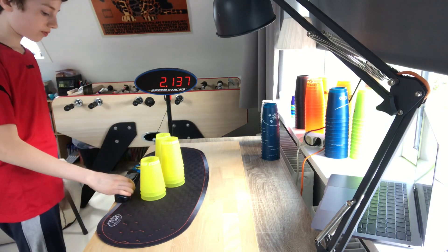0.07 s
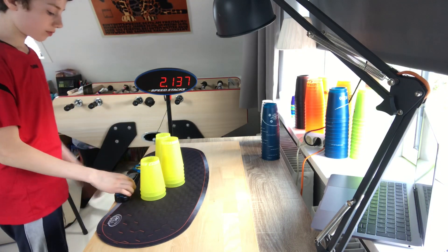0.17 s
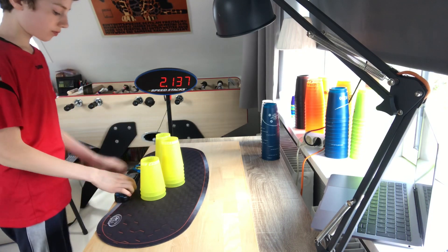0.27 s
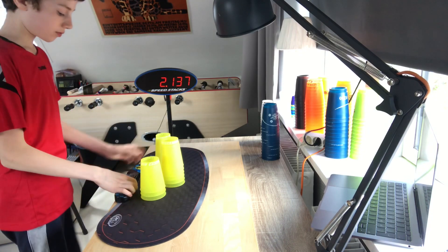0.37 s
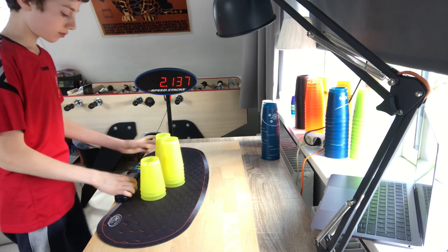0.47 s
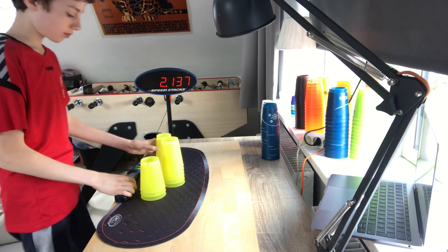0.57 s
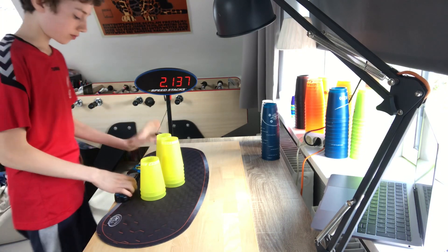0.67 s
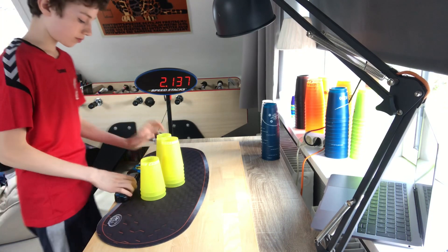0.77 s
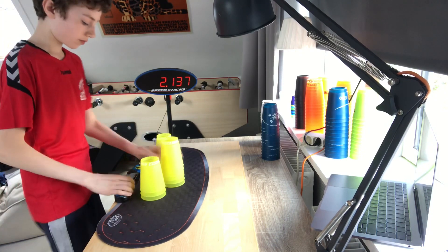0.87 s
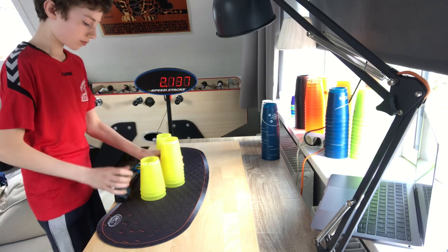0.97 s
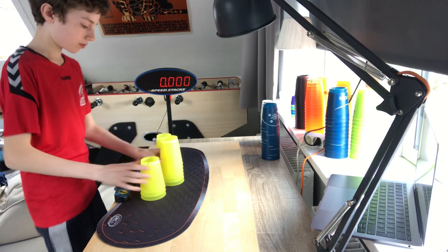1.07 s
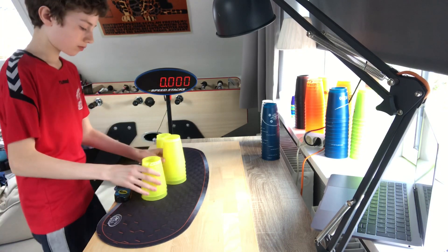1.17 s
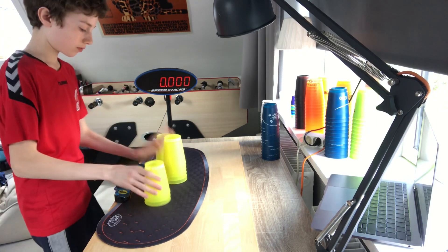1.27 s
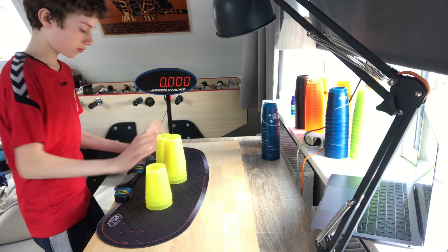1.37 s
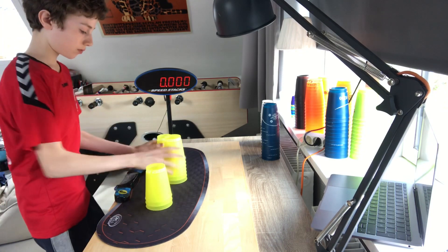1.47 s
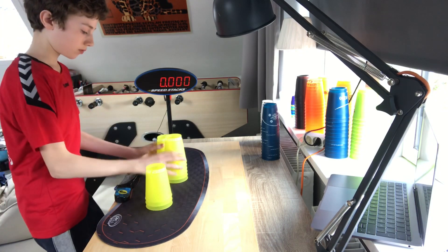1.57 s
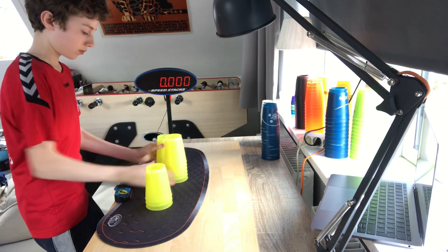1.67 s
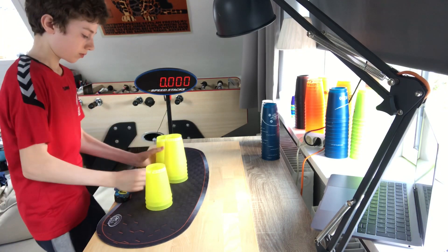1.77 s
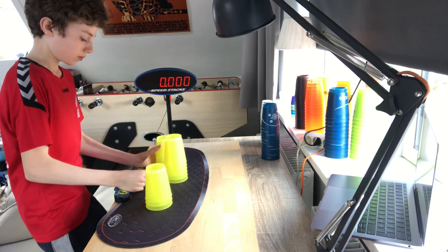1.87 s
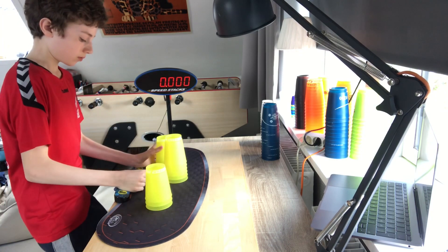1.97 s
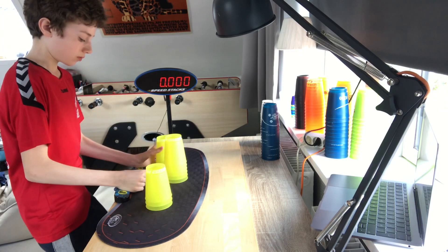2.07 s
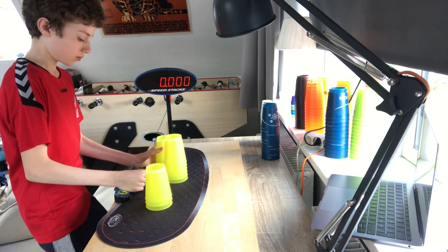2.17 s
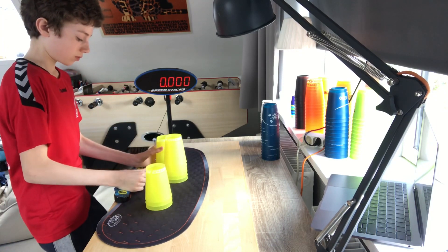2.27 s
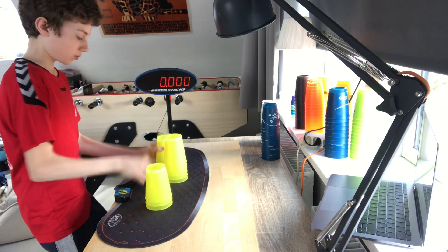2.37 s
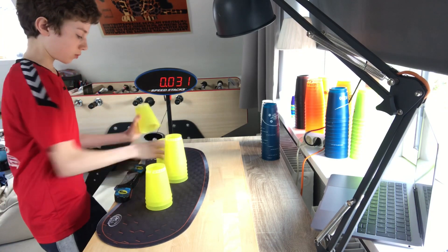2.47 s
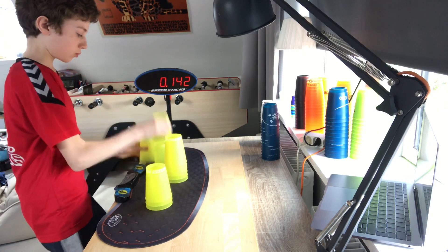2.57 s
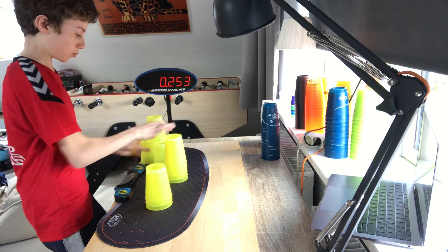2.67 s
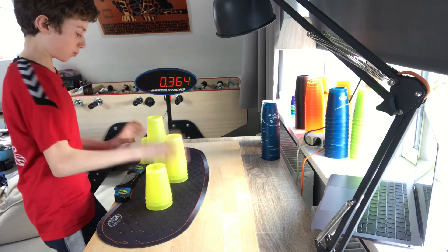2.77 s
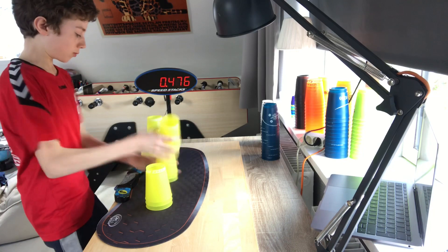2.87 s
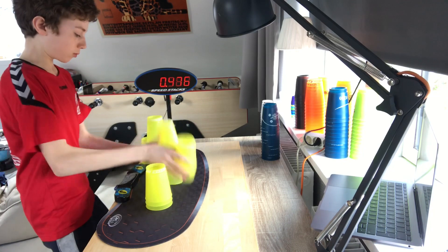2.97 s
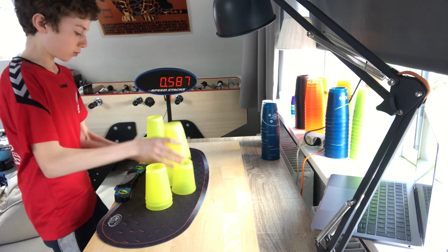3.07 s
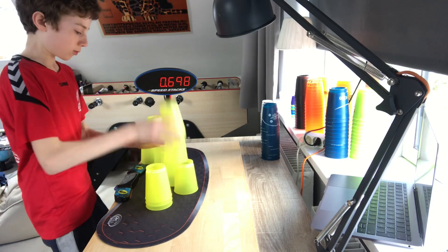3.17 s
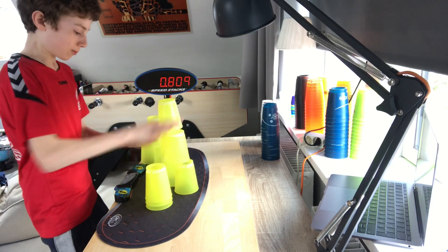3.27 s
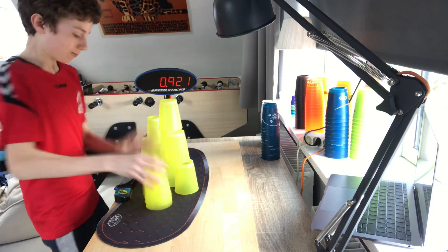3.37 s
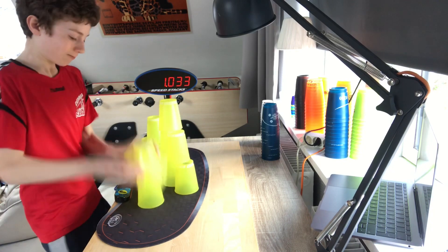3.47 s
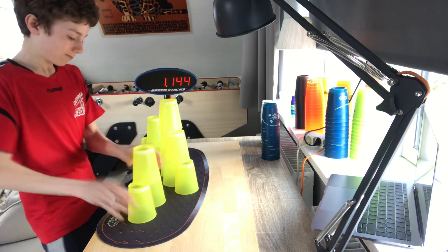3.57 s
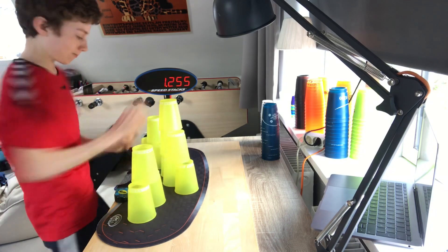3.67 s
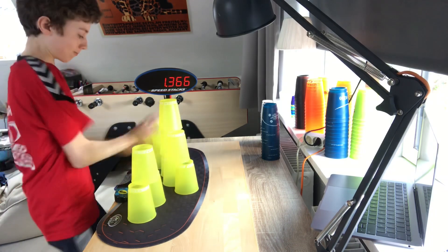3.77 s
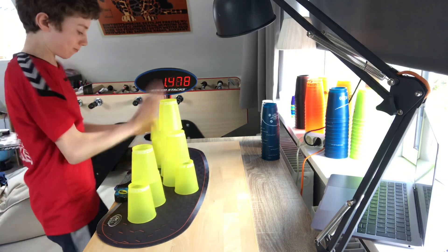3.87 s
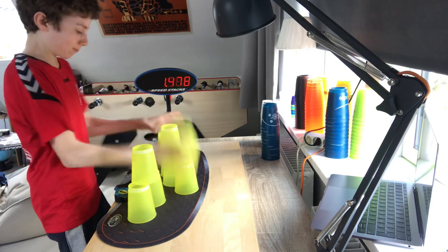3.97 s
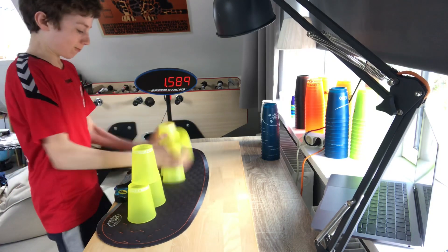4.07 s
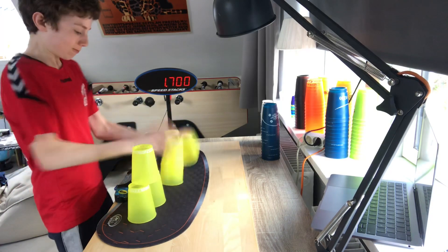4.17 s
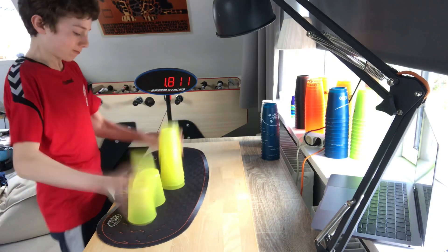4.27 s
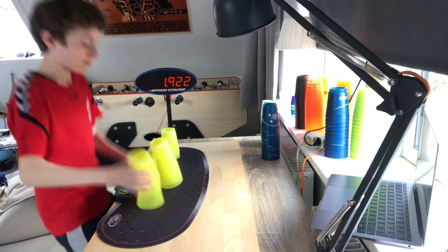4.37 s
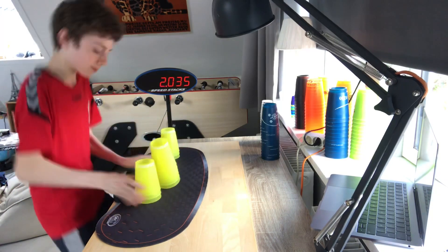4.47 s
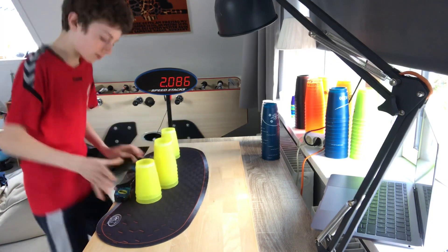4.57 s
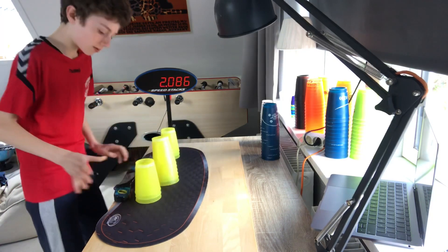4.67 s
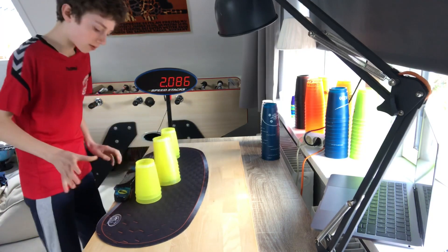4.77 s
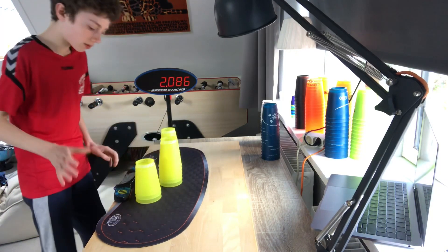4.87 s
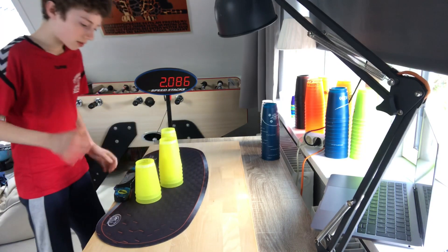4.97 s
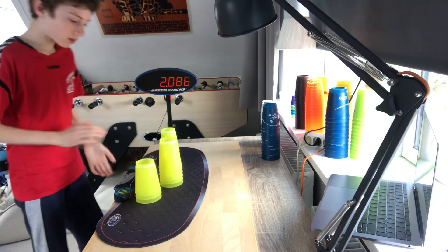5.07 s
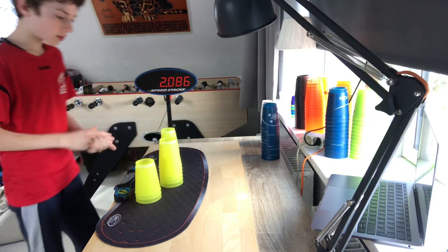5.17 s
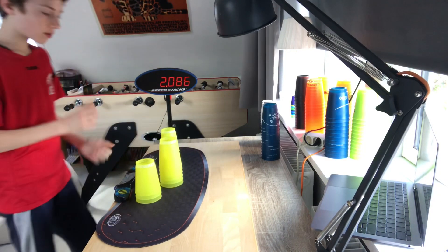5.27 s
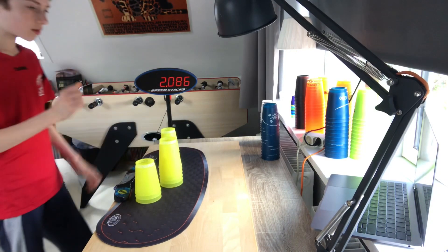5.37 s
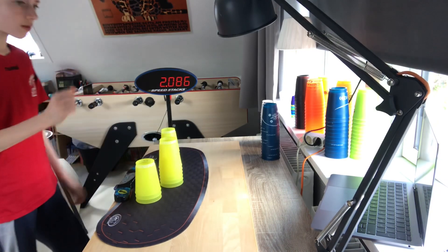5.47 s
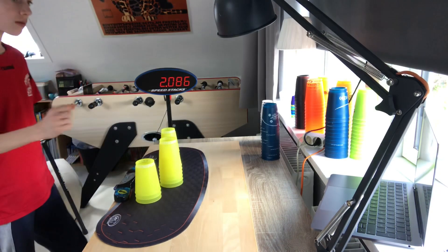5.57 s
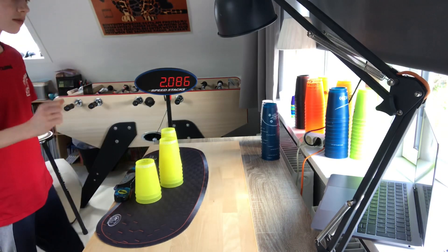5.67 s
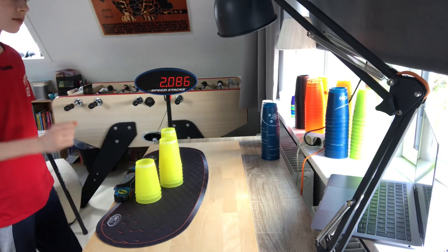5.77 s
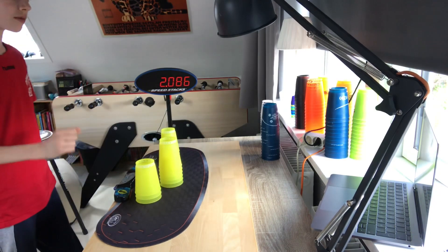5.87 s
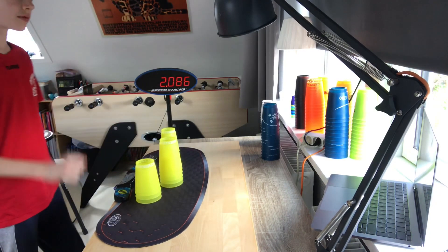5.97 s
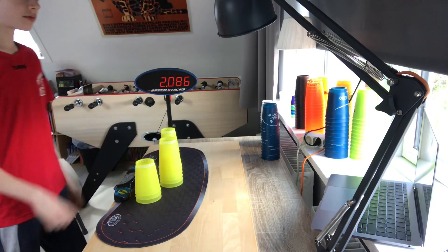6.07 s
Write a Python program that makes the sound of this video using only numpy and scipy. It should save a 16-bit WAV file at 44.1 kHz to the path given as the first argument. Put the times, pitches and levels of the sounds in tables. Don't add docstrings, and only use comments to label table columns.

```python
import sys
import numpy as np
from scipy import signal
from scipy.fft import rfft, irfft, next_fast_len
from scipy.io import wavfile
from scipy.ndimage import uniform_filter1d, map_coordinates

SR = 44100
rng = np.random.default_rng(int(sys.argv[2]) if len(sys.argv) > 2 else 0)


def waveform_to_disk(signal):
    frames = np.transpose(np.atleast_2d(signal))
    scaled = np.clip(frames, -1, 1) * 32767
    samples = np.round(scaled).astype(np.int16)
    wavfile.write(sys.argv[1], SR, samples)


def volts_from_db(level):
    exponent = np.asarray(level, float) / 20
    return 10 ** exponent


N = 269098

# (frequency [Hz], density [dB/Hz])
WHITE = [(20, 0), (20000, 0)]
# (frequency [Hz], density [dB/Hz])
AIR_SPECTRUM = [(22, -6.5), (59, -7.5), (285, -2.5), (500, -11), (1230, -16.5), (6560, -26.5), (14000, -33),
                (16000, -40)]
# (frequency [Hz], density [dB/Hz])
FLOOR_SPECTRUM = [(20, -25.5), (45, 9.5), (80, 1.5), (140, -10), (250, -46)]
# (time [s], fade [s], level [dB])
SWAYS = [(0, .4, -79), (1.04, .15, -53), (1.25, 0.22, -57.5), (1.82, .15, -50), (2.3, .25, -56),
         (2.9, .3, -51.5), (4.0, .25, -50.5), (4.47, .15, -45.5), (4.88, .3, -48), (5.3, .35, -51.5),
         (5.6, .12, -56)]
# (time [s], fade [s], level [dB], hiss over scrape [dB])
STROKES = [(.5, 0.056, -71, -1), (0.869, 0.17, -63.5, 1.5), (0.988, 0.053, -63, -1), (1.16, 0.16, -65, 1.5),
           (1.41, 0.02, -65, 0), (1.47, 0.12, -61.5, -3), (1.629, 0.15, -64, 1), (1.72, 0.1, -67, -4.5),
           (2.37, .04, -69, 22), (2.5, 0.034, -68.5, 10.5), (2.72, .12, -59, -14), (2.88, 0.15, -48, -2.5),
           (3.17, 0.14, -45.5, -5.5), (3.4, 0.14, -46.5, -3), (3.8, 0.099, -33.5, -0.5),
           (3.95, 0.13, -24.5, 1), (4.1, 0.091, -36, -3), (4.3, 0.13, -34.5, -10), (4.6, 0.17, -57.5, 4),
           (4.83, 0.069, -64, -8), (5.05, 0.19, -68, -2), (5.46, 0.11, -74, 0), (6.1, 0.142, -70, 6)]
# (frequency [Hz], density [dB/Hz])
HISS_SPECTRUM = [(1200, -23.5), (2200, 2.5), (3200, 5), (4200, 0.5), (5000, -0.5), (6500, -1),
                 (9000, -10.5), (15500, -21)]
# (frequency [Hz], density [dB/Hz])
SCRAPE_SPECTRUM = [(150, -32.5), (400, -2), (1000, -1.5), (1800, -0.5), (3000, -29)]

# (time [s], level [dB], hollow pitch [Hz], ring [ms], rim [dB])
SETUP = [(.4982, -56, 543, 33, -67), (.9019, -51.5, 422, 26, -71.5), (1.3918, -47, 448, 29, -53.5),
         (1.4557, -35, 487, 9, -49.5), (1.5053, -43, 448, 26, -75.5), (1.6563, -47.5, 560, 20, -65.5),
         (2.267, -55, 1310, 15, -62), (2.3223, -55, 1270, 12, -60), (2.3545, -58, 1000, 9.5, -54),
         (2.357, -46, 468, 38, -49.5), (2.363, -57.5, 3100, 55, -48.5), (2.4593, -48.5, 570, 27, -55),
         (2.4711, -45, 600, 22, -57.5), (2.5349, -41.5, 830, 28, -35.5), (2.5426, -42, 830, 33, -41.5),
         (2.5585, -41.5, 564, 50, -67), (2.601, -31, 600, 8.5, -54)]
# (time [s], level [dB], hollow pitch [Hz], ring [ms], rim [dB])
PAD_SLAPS = [
    (1.2099, -35, 1100, 15, -43.5),
    (1.2101, -39.5, 1640, 16, -54),
    (1.2102, -44, 2880, 19, -63),
    (1.2108, -37.5, 570, 27, -61),
    (1.6891, -10.5, 1080, 10, -26.5),
    (1.6894, -18, 3100, 3.9, -41.5),
    (1.6905, -17.5, 565, 37, -30),
]
# (time [s], level [dB], hollow pitch [Hz], ring [ms], rim [dB])
BASE = [(2.6056, -11, 1043, 30, -20), (2.6075, -12, 600, 53, -28), (2.6098, -33, 930, 20, -20.5),
        (2.757, -39, 860, 20, -42), (2.7642, -34, 900, 12, -29), (2.767, -32.5, 528, 30, -52),
        (2.8172, -35, 544, 15, -29), (2.8375, -29.5, 1690, 11, -37), (2.8448, -20, 970, 7, -27.5),
        (2.851, -47, 1480, 20, -34.5), (2.8932, -20, 990, 7.6, -23.5), (2.904, -37, 1200, 15, -38.5),
        (2.9722, -9, 930, 9.6, -43), (2.974, -19.5, 640, 37, -33), (2.9776, -19, 1110, 14, -21),
        (3.046, -15, 470, 26, -27.5), (3.1016, -31, 745, 20, -34), (3.1359, -14.5, 1027, 23, -26.5),
        (3.151, -20, 960, 14, -32), (3.158, -30.5, 800, 12, -42), (3.1647, -25, 1030, 9, -45),
        (3.173, -26.5, 1200, 9, -37.5), (3.1812, -20, 1039, 11, -29.5), (3.1916, -19, 970, 18, -32),
        (3.199, -14.5, 624, 20, -35), (3.2082, -8.5, 1315, 28, -17), (3.2172, -14, 1340, 20, -22.5),
        (3.229, -28, 1420, 22, -40.5), (3.2865, -24.5, 1350, 30, -43)]
# (time [s], level [dB], hollow pitch [Hz], ring [ms], rim [dB])
SMALL = [(3.329, -36.5, 632.4, 15, -34), (3.3525, -36, 600, 26, -31), (3.3705, -36, 2400, 11, -32.5),
         (3.3752, -23.5, 840, 20.5, -18.5), (3.3842, -23, 1080, 4, -34), (3.4445, -29, 944, 8.9, -22.5),
         (3.4478, -24.5, 910, 12, -20.5), (3.472, -28.5, 1170, 17, -45.5), (3.4763, -4.5, 1020, 17.5, -26),
         (3.4815, -1.5, 920, 11, -31.5), (3.487, -18, 1100, 9.5, -23.5), (3.506, -9.5, 1170, 15, -13.5),
         (3.511, -16, 696, 17, -14), (3.5172, -11.5, 840, 17, -23), (3.534, -20, 854, 28, -46),
         (3.7172, -30, 900, 8, -33.5), (3.7195, -11, 571, 40, -40.5)]
# (time [s], level [dB], hollow pitch [Hz], ring [ms], rim [dB])
SWEEP = [(3.7405, -26.5, 580, 42, -29), (3.7458, -37, 894, 15, -30), (3.759, -31, 931, 28, -21),
         (3.7687, -23.5, 1220, 27, -21), (3.7914, -15.5, 987, 17, -26), (3.8316, -24, 951, 9.7, -23.5),
         (3.8385, -20, 910, 20, -19.5), (3.859, -24, 597, 29, -35.5), (3.8748, -24.5, 1011, 27, -22.5),
         (3.883, -33, 3186, 33, -25.5), (3.901, -20.5, 1335, 42, -35), (3.9087, -17, 1030, 14, -32.5),
         (3.9184, -21, 1038, 9, -24), (3.9218, -11, 640, 22, -7.5), (3.9418, -19.5, 1120, 27, -5),
         (3.949, -21, 1930, 16, -9), (3.9565, -5, 735, 19, -18.5), (3.9675, -9.5, 980, 16, -8.5),
         (3.971, -11, 899, 12, -13.5), (3.9785, -26, 990, 8.9, -9.5), (4.0431, -29.5, 1040, 20, -46.5),
         (4.0736, -26, 1110, 25, -29.5)]
# (time [s], level [dB], hollow pitch [Hz], ring [ms], rim [dB])
FINISH = [(4.091, -16, 1960, 10, -12.5), (4.101, -31.5, 1000, 15, -21.5), (4.1357, -40.5, 856, 8, -49),
          (4.1541, -25, 803.6, 30, -19.5), (4.177, -35.5, 910, 10, -33.5), (4.1878, -18, 1430, 7.1, -30.5),
          (4.212, -18, 864, 30, -30), (4.217, -19, 940, 20, -21.5), (4.226, -29.5, 895, 17, -23),
          (4.2322, -17, 1410, 25, -8.5), (4.2403, -6, 1476, 20, -7.5), (4.2611, -11.5, 700, 20, -22),
          (4.272, -18.5, 1294, 25, -20), (4.3142, -12, 860, 19, -13), (4.3338, -12, 630, 30, -16.5),
          (4.342, -14, 500, 25, -25.5), (4.3572, -8, 818, 60, -9.5), (4.364, -20, 902, 12, -19.5),
          (4.3697, -3, 843, 12, -22), (4.3895, -10, 3800, 7, -15), (4.3925, -7, 2800, 9, -22),
          (4.396, -8, 1840, 9, -25), (4.401, -17.5, 1100, 12, -23.5), (4.4205, -17, 630, 9.7, -32.5)]
# (time [s], level [dB], hollow pitch [Hz], ring [ms], rim [dB])
AFTER = [
    (4.7884, -40.5, 520, 7.3, -64),
    (4.7882, -37.5, 2040, 8.4, -58),
    (4.8215, -33, 1446, 7.8, -39),
    (4.8218, -36.5, 3180, 5.6, -53),
    (4.8225, -37.5, 673, 68, -59),
    (4.8855, -41, 1490, 7.5, -61),
    (4.89, -43, 520, 27, -67),
]
# (contacts, brightness [dB])
STAGES = [
    (PAD_SLAPS, -18.5),
    (SETUP, 0.11),
    (BASE, -0.14),
    (SMALL, -0.91),
    (SWEEP, 1.3),
    (FINISH, 0.1),
    (AFTER, -6),
]

# (frequency [Hz], level [dB], t60 [s])
WALL_MODES = [(580, -13.5, 0.056), (830, -21, 0.0061), (1080, -4.5, .025), (1290, -14, 0.047),
              (1935, -15.5, 0.03)]
# (frequency [Hz], width [Hz], level [dB])
STACK_BODY = [(328, 100, -10), (600, 360, 3.5), (1120, 420, 3), (1510, 530, 0), (2040, 2500, -16.5)]
# (frequency [Hz], width [Hz], level [dB])
RIM = [(3324, 410, -5.5), (4120, 410, 0.5), (5850, 1100, -1.5)]
# (frequency [Hz], width [Hz], level [dB])
FINE_RIM = [(6800, 1500, 7), (8800, 3000, -4.5), (11160, 900, -7.5), (14890, 2300, -10)]
# (frequency [Hz], width [Hz], level [dB])
FLAT_SLAP = [(1880, 2200, 3.5)]
# (frequency [Hz], level [dB], t60 [s])
LIP_MODES = [(2560, -10, .015), (3260, -2, 0.032), (3930, -6.5, .022), (4240, -2.5, 0.02),
             (5780, -2.5, 0.017)]
# (frequency [Hz], width [Hz], depth [0-1])
RIM_NOTCH = (5050, 500, 0.44)
# (delay [ms], level [dB])
WALL_ECHOES = [(4.2, -21.5), (9.5, -14.5), (12.1, -22.5)]
# (frequency [Hz], t60 [s])
ROOM_DECAY = [(100, 0.94), (420, .33), (1100, 0.28), (2500, 0.32), (3700, .26), (7700, 0.22), (15000, 0.08)]

# (time [s], peak [dB], frequency [Hz])
THUMPS = [(0.978, -38.5, 69.4), (1.513, -47.5, 65), (1.726, -32, 61.7), (2.756, -44.5, 136),
          (2.967, -47.5, 138), (3.519, -40.5, 142), (3.749, -28, 55.5), (3.964, -29.5, 82),
          (4.359, -17, 160.7), (4.394, -18.5, 142), (4.362, -7, 64.6), (4.6, -28, 48)]
# (frequency [Hz], level [dB], t60 [s])
FRAME_MODES = [(52.4, -21.5, 1.1), (81.5, -13, 0.8), (91.8, -11, 0.21), (72, -41, 3.4)]
# (time [s], level [dB])
LANDINGS = [(1.18, -56), (1.392, -58.5), (1.4566, -58.5), (1.5044, -49.5), (1.6901, -33.5), (2.471, -50),
            (2.5565, -42), (2.609, -34.5), (2.7663, -36.5), (2.8452, -38), (2.9803, -28.5), (3.049, -35.5),
            (3.151, -39.5), (3.1812, -35.5), (3.3228, -46.5), (3.4794, -31.5), (3.516, -35),
            (3.7185, -30.5), (3.769, -35), (3.909, -36), (3.9539, -28.5), (3.965, -21), (4.0441, -35.5),
            (4.1556, -33.5), (4.212, -31), (4.2606, -26), (4.3567, -24), (4.394, -31), (4.4391, -30.5),
            (4.7893, -37.5), (4.822, -43), (4.889, -47.5), (5.0981, -46)]
# (frequency [Hz], level [dB], t60 [s])
DESK_MODES = [(150.7, -8.5, 0.12), (212, -7, 0.11), (264.3, -9, 0.23), (273.1, -4, 0.28),
              (369, -10.5, 0.14)]
# (time [s], level [dB], frequency [Hz], ring [ms])
PINGS = [(2.605, -23, 690, 14), (2.612, -22, 5610, 16), (2.613, -16, 900, 16), (2.854, -44, 1000, 14),
         (2.977, -17, 1280, 10), (2.998, -21.5, 580, 20), (3.051, -27, 810, 16), (3.136, -18.5, 1375, 10),
         (3.136, -27.5, 5800, 12), (3.191, -14, 1263, 12), (3.214, -18.5, 4260, 20), (3.222, -14, 1263, 14),
         (3.247, -23.5, 1144, 16), (3.375, -33.5, 6490, 10), (3.389, -33, 1237, 25),
         (3.404, -33.5, 820, 25), (3.43, -32, 478.5, 14), (3.447, -26, 900, 14), (3.4773, -9, 1500, 4),
         (3.478, -18, 1705, 10), (3.488, -21.5, 1950, 20), (3.505, -18.5, 2303, 14),
         (3.518, -13.5, 1140, 14), (3.537, -20.5, 900, 20), (3.573, -33, 1270, 18),
         (3.741, -26.5, 1268, 12), (3.922, -9, 5650, 9), (3.926, -12, 1100, 9), (3.931, -24.5, 6400, 12),
         (3.942, -14, 3567, 14), (3.941, -16.5, 6270, 10), (3.946, -17.5, 5400, 12), (3.947, -16, 4167, 12),
         (3.954, -18.5, 6430, 12), (3.967, -16.5, 3560, 12), (3.971, -11.5, 1100, 10),
         (3.976, -18, 4020, 14), (4.155, -20, 1450, 6), (4.2329, -11.5, 2200, 4), (4.233, -21, 801.5, 12),
         (4.249, -14.5, 1950, 14), (4.253, -15, 1031, 14), (4.321, -20.5, 573.5, 18), (4.343, -18, 804, 14),
         (4.355, -18, 1034, 10), (4.358, -16.5, 5810, 8), (4.363, -20, 4063, 16), (4.385, -22, 1380, 12),
         (4.397, -17.5, 460, 14), (4.406, -21.5, 1380, 12),
         (1.211, -43, 690, 27), (1.39, -53, 970, 24), (1.456, -51, 560, 23), (1.456, -48, 893, 23),
        (1.462, -55, 6200, 10), (1.689, -25.5, 3700, 6), (2.268, -58, 3950, 12), (2.537, -49, 1890, 30),
        (2.544, -46, 2950, 20), (2.8375, -35, 1690, 8), (3.286, -30.5, 620, 20), (3.302, -30, 600, 25),
        (3.328, -33.5, 900, 20), (3.418, -33.5, 780, 20), (4.788, -40.5, 2800, 8.4), (4.788, -44, 1410, 6),
        (4.821, -42, 6300, 8), (4.886, -48, 2000, 6)]
# (time [s], peak [dB])
SNAP = (5.0955, 1.6)
# (frequency [Hz], width [Hz], level [dB])
PALM = [(330, 280, -11), (667, 100, -1), (1100, 760, -7), (2520, 270, 1.5), (3380, 670, -1.5),
        (4650, 350, -17), (5592, 390, -28), (7900, 1680, -17), (9400, 1200, -22), (13670, 2600, -23.5)]
# (time [s], frequency [Hz], level [dB], roughness [0-1])
SQUEAKS = [
    [(5.944, 3660, -97.5, 0.019), (5.952, 3640, -67.5, .05), (5.99, 3640, -66, .1), (6.01, 3630, -98, 0.11)],
    [(5.955, 3396, -95.5, .5), (5.975, 3390, -65.5, 0.63), (6.008, 3360, -62, 0.95),
     (6.05, 3310, -64, 0.61), (6.075, 3320, -65, 0.21), (6.11, 3330, -57, 0.12)],
]


def unit(x):
    return x / np.sqrt(np.mean(x ** 2) + 1e-20)


def along(points, hz):
    f, v = np.transpose(points)
    return np.interp(np.log(hz + 1), np.log(f + 1), v)


def curves(rows):
    s, *cols = np.transpose(rows)
    return [np.interp(np.arange(N) / SR, s, c) for c in cols]


def filtered(x, response):
    m = next_fast_len(N + SR // 2)
    return irfft(rfft(x, m) * response(np.fft.rfftfreq(m, 1 / SR)), m)[:N]


def resonances(peaks):
    def response(f):
        total = 0
        for k, (center_hz, width_hz, db) in enumerate(peaks):
            damping = 1j * f * width_hz
            total = total + (-1) ** k * volts_from_db(db) * damping / (center_hz ** 2 - f * f + damping)
        return total
    return response


def noise(spectrum, grain_db, rate_hz):
    knots = rng.standard_normal(int(N * rate_hz / SR) + 4)
    flicker = map_coordinates(knots, [np.arange(N) * rate_hz / SR])
    colored = filtered(rng.standard_normal(N), lambda hz: volts_from_db(along(spectrum, hz)))
    return unit(volts_from_db(grain_db * flicker) * colored)


def ring(modes, t, luck, spread_db, detune, attack_s):
    tones = 0
    for (hz, db, t60_s), (strength, shift) in zip(modes, luck):
        decay = volts_from_db(db + spread_db * strength - 60 * t / t60_s)
        tones = tones + decay * np.sin(2 * np.pi * hz * (1 + detune * shift) * t)
    return tones * (1 - np.exp(-t / attack_s))


def add(track, s, sound):
    track[round(s * SR):][:len(sound)] += sound


def swells(rows):
    rise_share, hop = 0.18, 8
    t = np.arange(0, N, hop) / SR
    power = 0
    for s, fade_s, db in rows:
        away = np.maximum((s - t) / rise_share, t - s) / fade_s
        power = power + volts_from_db(2 * (db - 10 * away))
    return np.sqrt(np.repeat(power, hop)[:N])


def quiet_house():
    air_db, still_db = -66, -65.5
    air = volts_from_db(air_db) * noise(AIR_SPECTRUM, grain_db=-0.5, rate_hz=3.3)
    floor_level = np.hypot(volts_from_db(still_db), swells(SWAYS))
    return air + floor_level * noise(FLOOR_SPECTRUM, grain_db=3.0, rate_hz=5.5)


def rubbing():
    hiss = noise(HISS_SPECTRUM, grain_db=2, rate_hz=250)
    scrape = noise(SCRAPE_SPECTRUM, grain_db=1.5, rate_hz=120)
    hiss_level = swells([(s, fade_s, db + tilt_db / 2 + 0.5) for s, fade_s, db, tilt_db in STROKES])
    scrape_level = swells([(s, fade_s, db - tilt_db / 2) for s, fade_s, db, tilt_db in STROKES])
    return hiss_level * hiss + scrape_level * scrape


def hollows():
    tone, jostle = np.zeros((2, N + SR))
    t = np.arange(SR // 8) / SR
    contacts = [row for stage, _ in STAGES for row in stage]
    luck = rng.standard_normal((len(contacts), len(WALL_MODES), 2))
    grit = noise(WHITE, grain_db=2.5, rate_hz=240)
    for (s, db, hollow_hz, ms, _), chance in zip(contacts, luck):
        t60_s = np.clip(ms / 1000, .0055, .07)
        swell_s = ms / hollow_hz * 0.05
        pop = ring([(hollow_hz, 0, t60_s)], t, [(0, 0)], spread_db=0, detune=0, attack_s=swell_s)
        walls = ring(WALL_MODES, t, chance, spread_db=5, detune=0.016, attack_s=0.00023)
        add(tone, s, volts_from_db(db + 8.0) * (pop + volts_from_db(-11.0 - ms * 0.067) * walls))
        shaking = volts_from_db(-60 * t / (t60_s * 1.9)) * grit[round(s * SR):][:len(t)]
        shaking[0] += volts_from_db(18.0 - ms * 0.1)
        add(jostle, s, volts_from_db(db + 7.5 - ms * 0.22) * shaking)
    return tone[:N] + filtered(jostle[:N], resonances(STACK_BODY))


def rims():
    rattle_per_ring, rattle_most_ms = 1.7, 66
    crack_db, fine_crack_db, crack_t60_s = -0.5, -4.5, 0.0032
    base_bright_db, duller_per_db, lip_db = -18, 0.3793, -7.5
    rattle, edge, slap, lip = np.zeros((4, N + SR))
    t = np.arange(SR // 6) / SR
    lip_t = t[:SR // 20]
    grit = np.array([noise(WHITE, grain_db=3.5, rate_hz=900) for _ in range(3)])
    contacts = [(row, stage_db) for stage, stage_db in STAGES for row in stage]
    for (s, _, _, ring_ms, db), stage_db in contacts:
        ms = min(rattle_per_ring * ring_ms, rattle_most_ms)
        bright_db = base_bright_db + stage_db - duller_per_db * db
        crack = volts_from_db(np.array([[crack_db], [fine_crack_db], [crack_db]]) - 60 * t / crack_t60_s)
        chatter = volts_from_db(-1.5 - 60 * t / np.clip(ms / 650, .004, .15))
        rim, fine, flat = (crack + chatter) * grit[:, round(s * SR):][:, :len(t)]
        rim[0] += volts_from_db(5.0)
        chance = rng.standard_normal((len(LIP_MODES), 2))
        lip_ring = ring(LIP_MODES, lip_t, chance, spread_db=2.5, detune=0.007, attack_s=0.00024)
        add(lip, s, volts_from_db(db + lip_db) * lip_ring)
        add(rattle, s, volts_from_db(db + 4.0) * rim)
        add(edge, s, volts_from_db(db + bright_db) * fine)
        add(slap, s, volts_from_db(db - bright_db * 0.63 - 10.5) * flat)
    whole = lip[:N]
    for layer, peaks in [(rattle, RIM), (edge, FINE_RIM), (slap, FLAT_SLAP)]:
        whole = whole + filtered(layer[:N], resonances(peaks))
    hz, width_hz, depth = RIM_NOTCH
    notch = resonances([(hz, width_hz, 0)])
    return filtered(whole, lambda f: 1 - np.clip(depth, 0, 1) * notch(f))


def room(x):
    out = np.zeros(N + SR)
    for ms, db in WALL_ECHOES:
        add(out, ms / 1000, volts_from_db(db) * x)
    frames = dict(fs=SR, nperseg=512, noverlap=448)
    hz, t, z = signal.stft(x, **frames)
    power = np.abs(z) ** 2
    spread = 0
    for share, bins in [(.68, 2), (.22, 7), (.1, 28)]:
        spread = spread + share * uniform_filter1d(power, size=bins, axis=0)
    spread = spread * volts_from_db(19.0) ** 2
    kept = volts_from_db(-2 * 60 * t[1] / along(ROOM_DECAY, hz))
    stored = [signal.lfilter([1 - k], [1, -k], band) for k, band in zip(kept, spread)]
    diffuse = signal.stft(rng.standard_normal(N), **frames)[2]
    tail = signal.istft(diffuse * np.sqrt(np.abs(stored)), **frames)[1]
    add(out, .009, tail[:N])
    return out[:N]


def thumps():
    low, t = np.zeros(N + 2 * SR), np.arange(2 * SR) / SR
    even = np.zeros((len(FRAME_MODES) + 1, 2))
    for s, db, hz in THUMPS:
        modes = [(hz, 0, .17)] + FRAME_MODES
        add(low, s, volts_from_db(db + 1.5) * ring(modes, t, even, spread_db=0, detune=0, attack_s=0.0064))
    return low[:N]


def desk():
    wood, t = np.zeros(N + SR), np.arange(SR // 2) / SR
    luck = rng.standard_normal((len(LANDINGS), len(DESK_MODES), 2))
    for (s, db), chance in zip(LANDINGS, luck):
        drum = ring(DESK_MODES, t, chance, spread_db=1.9, detune=0.007, attack_s=0.0034)
        add(wood, s, volts_from_db(db + 6.0) * drum)
    return wood[:N]


def pings():
    out, t = np.zeros(N + SR), np.arange(SR // 10) / SR
    for s, db, hz, ms in PINGS:
        tone = ring([(hz, 0, ms / 1000)], t, [(0, 0)], spread_db=0, detune=0, attack_s=0.36 / hz)
        add(out, s, volts_from_db(db + 7.0) * tone)
    return out[:N]


def snap():
    snap_s, peak_db = SNAP
    t = np.clip(np.arange(N) / SR - snap_s, 0, .05)
    swell = (t / 0.002) ** 2 * np.exp(-t / 0.0013) * (t < .05)
    chirp = np.sin(2 * np.pi * (2100 * t + 47000.0 * t ** 2))
    slap = rng.standard_normal(N) * volts_from_db(5.5) * swell
    slap[round((snap_s + .002) * SR)] += 6.5
    return volts_from_db(peak_db) * (swell * chirp + filtered(slap, resonances(PALM)))


def squeak(joint):
    hz, db, rough = curves(joint)
    shake = noise([(20, 0), (150, -3), (400, -30)], grain_db=1.5, rate_hz=5)
    tone = np.sin(2 * np.pi * np.cumsum(hz) / SR)
    return volts_from_db(db) * (1 - rough + rough * shake) * tone


def scene():
    near = hollows() + rims() + pings() + snap()
    body = desk() + thumps()
    squeaks = sum(squeak(joint) for joint in SQUEAKS)
    return (near + room(near) + body + rubbing() + squeaks + quiet_house())[None]


def roll_off(x):
    return signal.sosfilt(signal.butter(12, 16500, fs=SR, output="sos"), x)


def record(dry):
    clip_level, top_hz, bass_hz = .91, 15750, 36
    x = dry[0] / (1 + np.abs(dry[0] / clip_level) ** 6) ** (1 / 6)

    def response(hz):
        treble = np.interp(hz, [top_hz - 150, top_hz + 100], [1, .03])
        return treble * (1j * hz / (bass_hz + 1j * hz)) ** 4

    return roll_off(filtered(x, response)[None])


dry = scene()
out = record(dry)
waveform_to_disk(out)
```